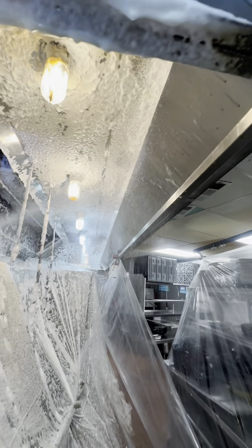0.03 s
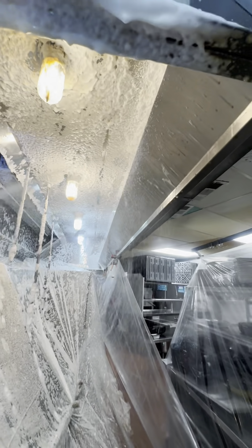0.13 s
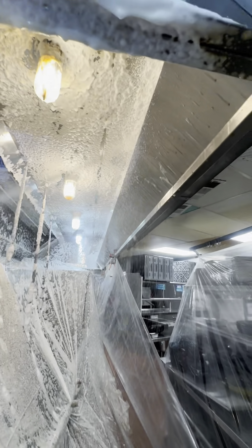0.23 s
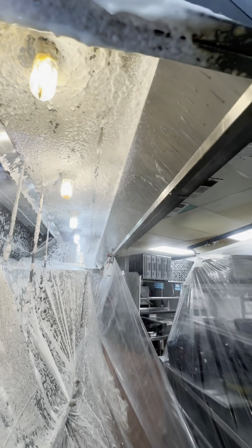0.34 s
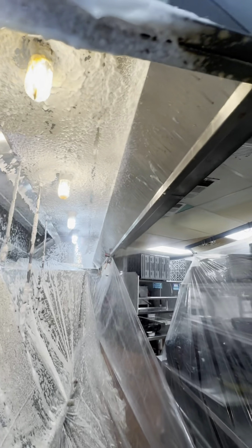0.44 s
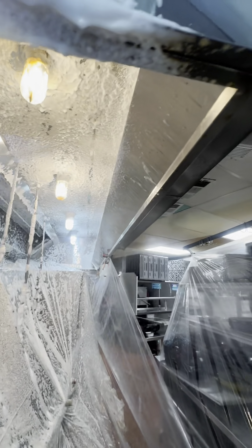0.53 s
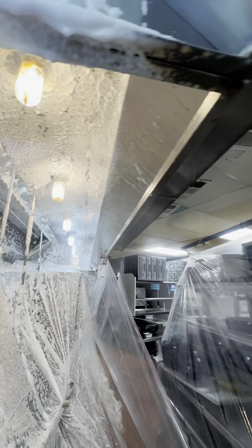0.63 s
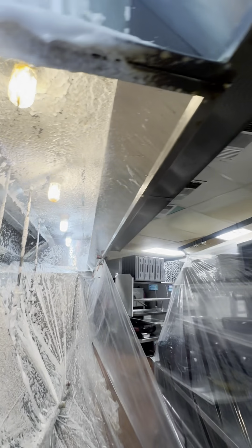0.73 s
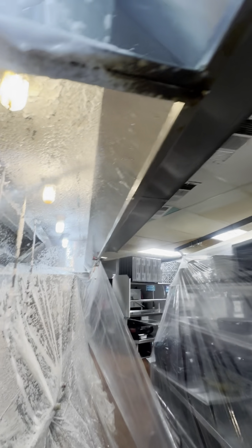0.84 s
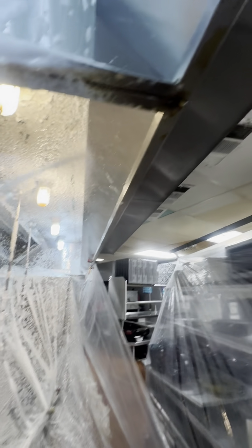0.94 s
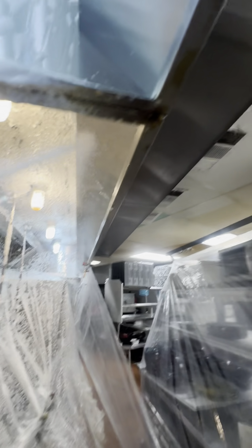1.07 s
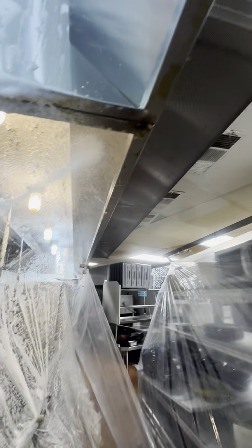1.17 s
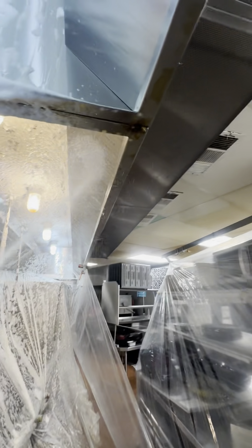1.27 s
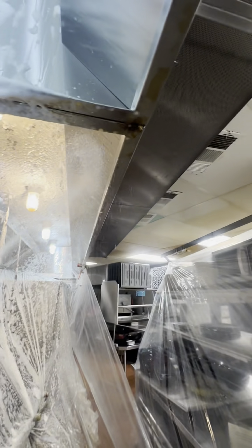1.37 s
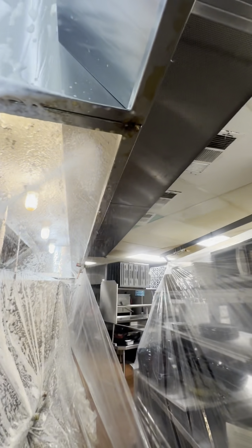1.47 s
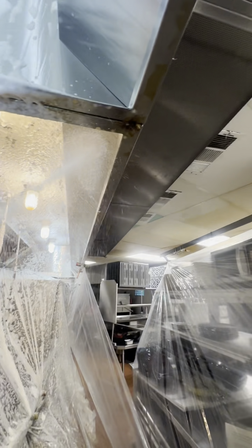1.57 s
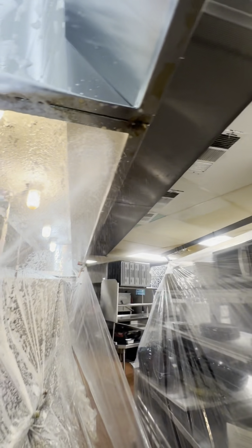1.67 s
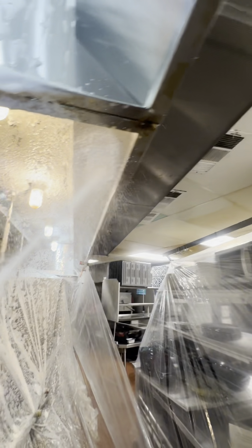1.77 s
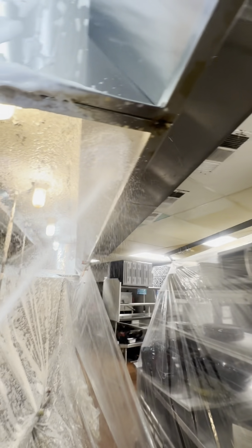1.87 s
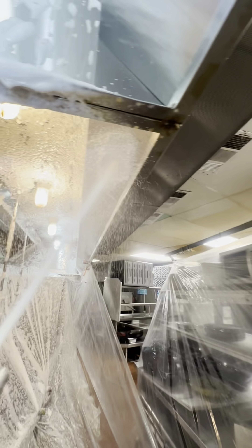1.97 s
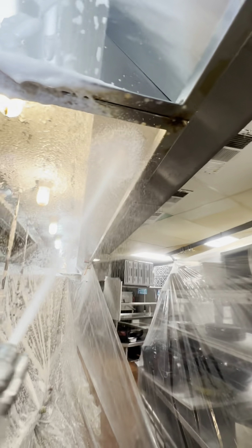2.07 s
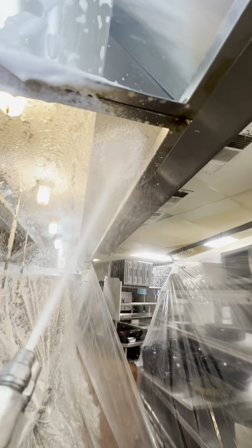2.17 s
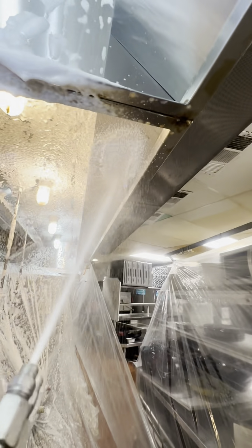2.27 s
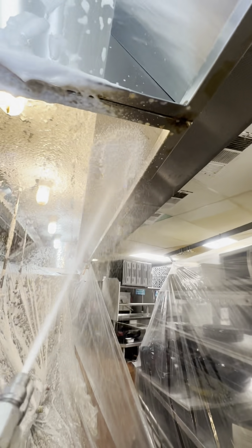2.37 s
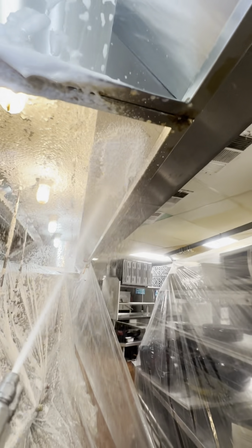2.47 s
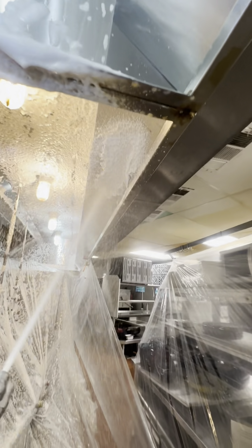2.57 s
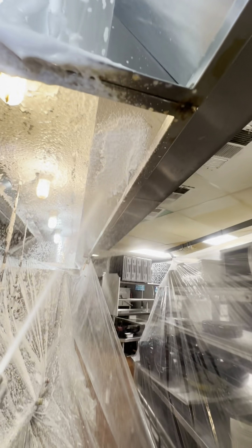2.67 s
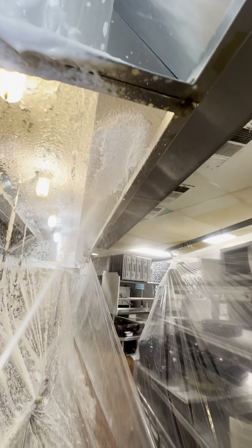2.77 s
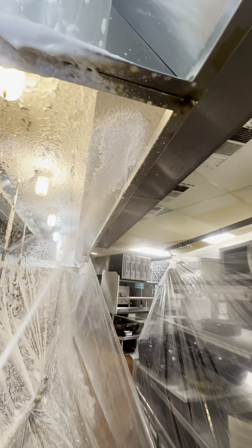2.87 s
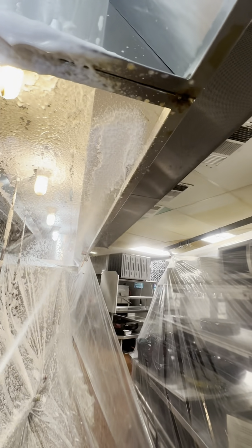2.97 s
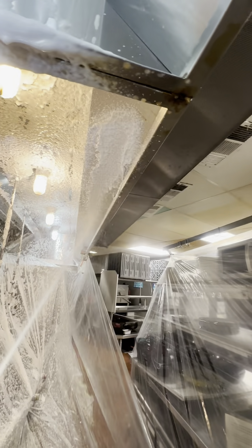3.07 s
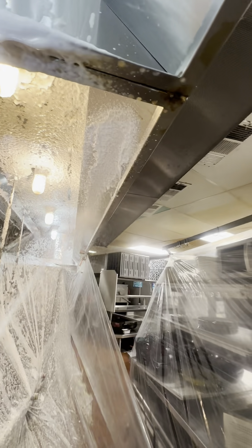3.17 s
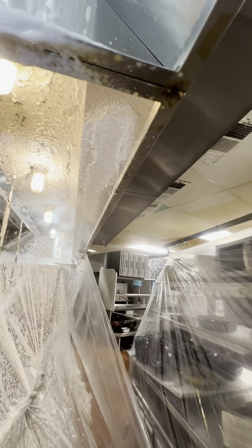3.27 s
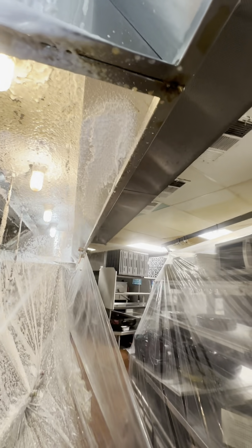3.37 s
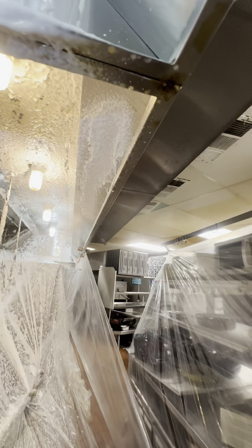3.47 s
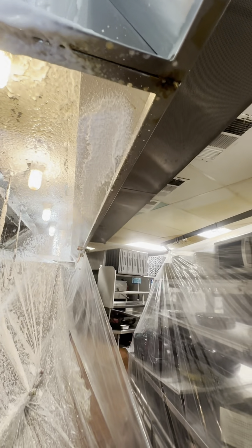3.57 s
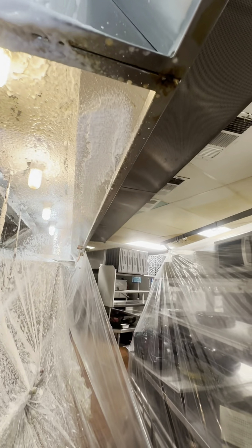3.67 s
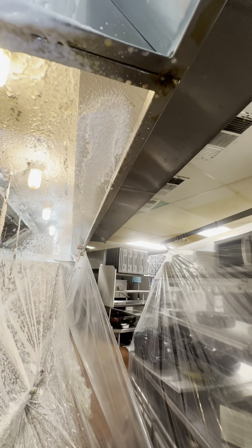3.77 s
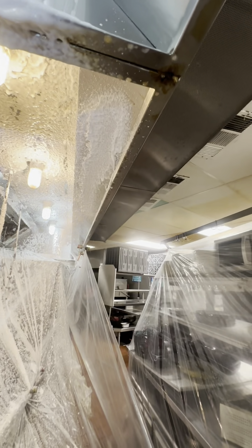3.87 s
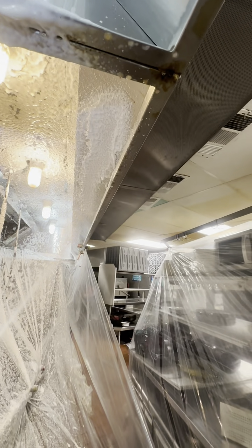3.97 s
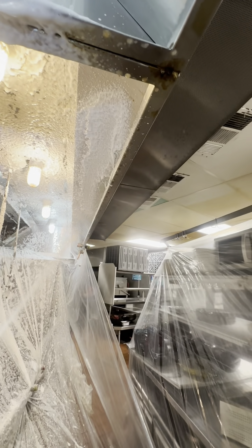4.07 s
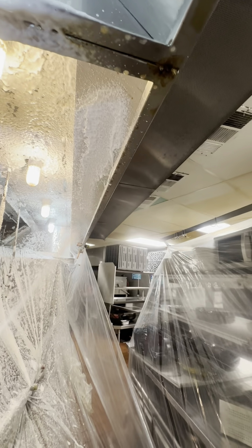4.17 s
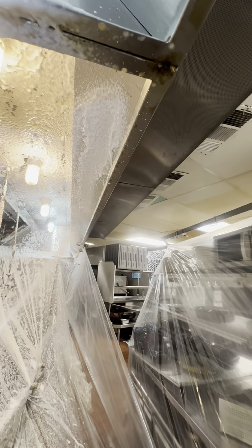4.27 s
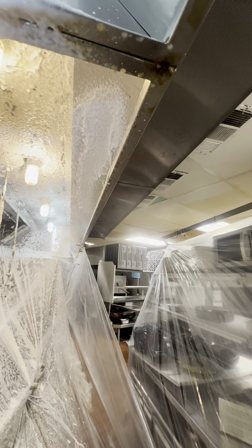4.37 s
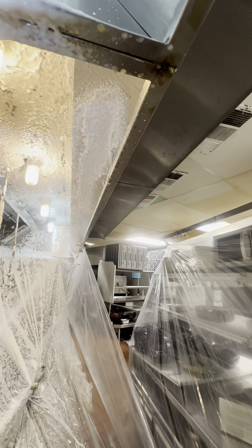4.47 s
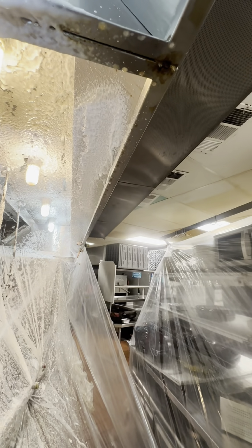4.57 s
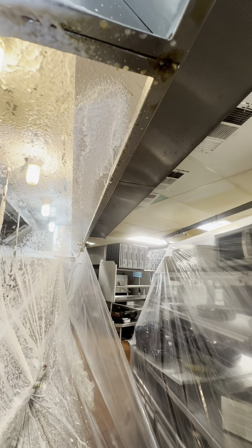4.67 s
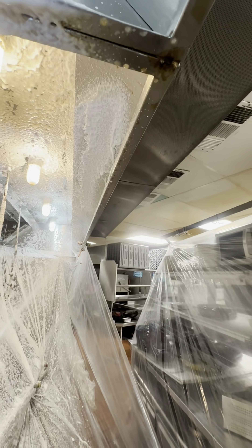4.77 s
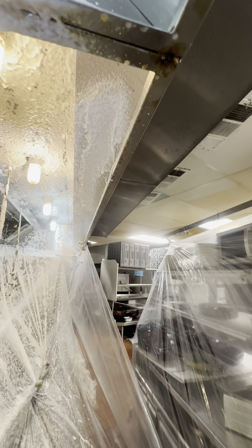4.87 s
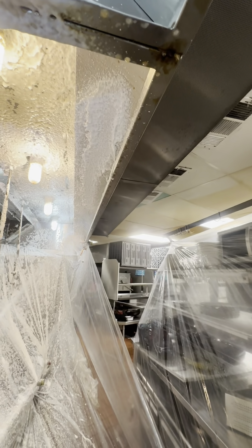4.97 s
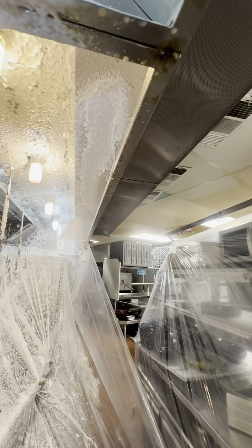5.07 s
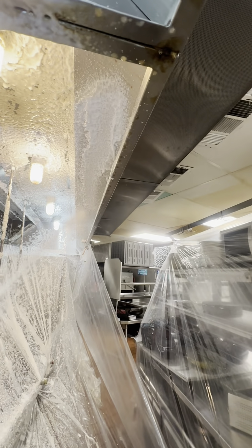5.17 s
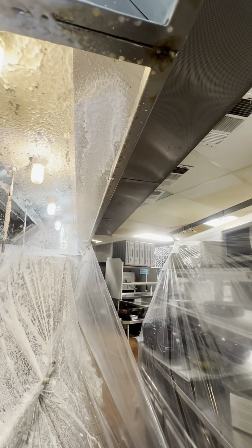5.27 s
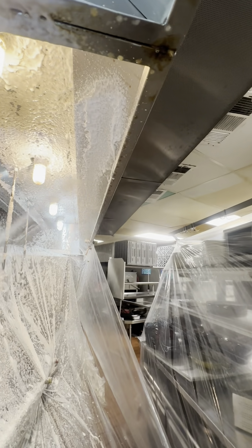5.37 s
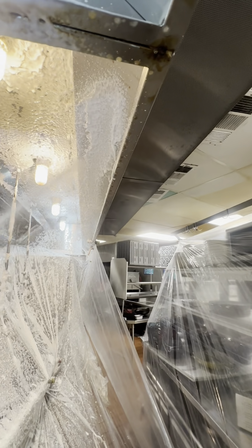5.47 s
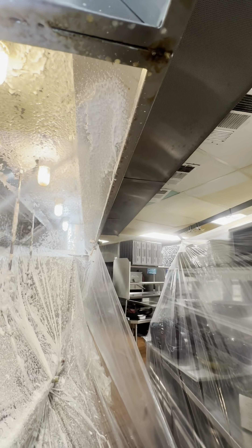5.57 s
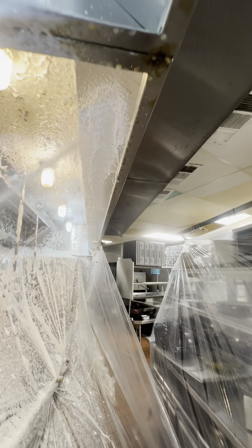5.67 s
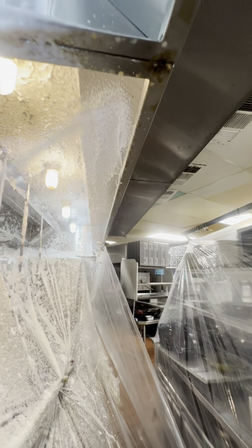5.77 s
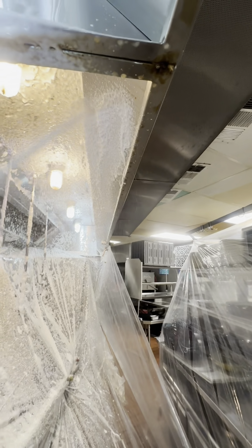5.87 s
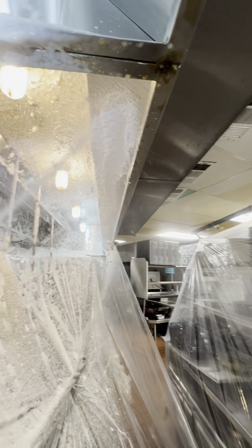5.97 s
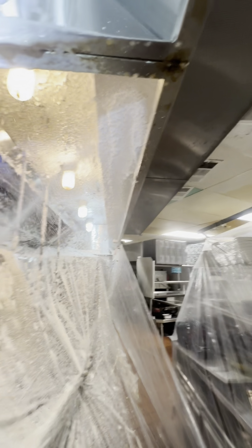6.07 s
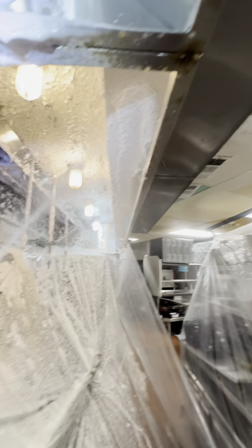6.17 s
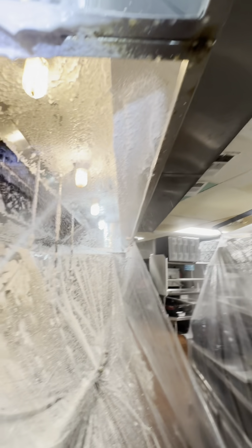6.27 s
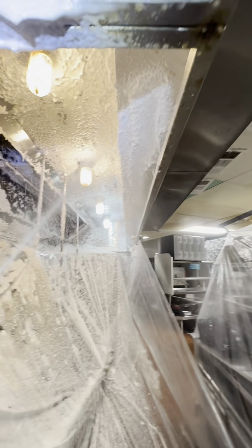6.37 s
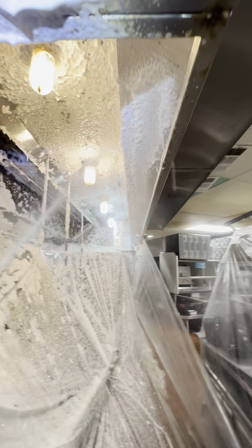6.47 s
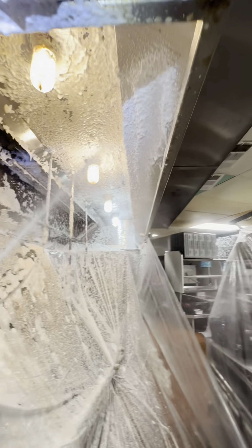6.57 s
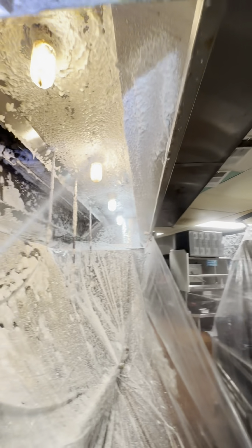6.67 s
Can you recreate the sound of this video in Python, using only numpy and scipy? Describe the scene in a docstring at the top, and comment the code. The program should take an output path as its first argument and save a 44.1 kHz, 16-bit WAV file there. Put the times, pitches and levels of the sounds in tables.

```python
"""A steel kitchen hood with hanging plastic sheets, swept by a pressure washer jet close to a phone.
A faint pump hum and a low rumble of sheet steel, both filtered noise, lie underneath.
On top, the jet strikes five places: each splash is noise mixed with short ringing drops.
The phone's two microphone ports colour each place differently left and right, so the hiss
changes colour and side as the wand moves, and narrow bands of it turn hollow for a while."""
import sys
import numpy as np
from scipy import signal
from scipy.fft import rfft, irfft
from scipy.io import wavfile
from scipy.ndimage import uniform_filter1d

SR = 44100
rng = np.random.default_rng(int(sys.argv[2]) if len(sys.argv) > 2 else 0)


def waveform_to_disk(signal):
    """Save audio, clipped to [-1, 1], as 16-bit WAV at the path in sys.argv[1]."""
    frames = np.transpose(np.atleast_2d(signal))
    scaled = np.clip(frames, -1, 1) * 32767
    samples = np.round(scaled).astype(np.int16)
    wavfile.write(sys.argv[1], SR, samples)


N = 295911  # samples
EDGE_HZ = 15650  # nothing but a trace is heard above this
FRAME, HOP = 512, 128  # short-time spectra, samples


def gain_of(db):
    """Decibels to an amplitude factor."""
    return 10 ** (np.asarray(db) / 20)


def evened(x):
    """Scaled to rms 1."""
    return x / np.sqrt(np.mean(abs(x) ** 2) + 1e-20)


def curve(points_hz, values, hz):
    """Straight lines between points on a log-frequency axis, as a column."""
    return np.interp(np.log(hz + 1), np.log(points_hz + 1), values)[:, None]


def over_time(points, t):
    """Straight lines between (seconds, value) points."""
    return np.interp(t, *np.transpose(points))


def seconds_outside(t, start, end):
    """How far each moment lies before the start or after the end; 0 in between."""
    return np.maximum(np.maximum(start - t, t - end), 0)


def spectra_of(x):
    """Short-time spectra."""
    return signal.stft(x, nperseg=FRAME, noverlap=FRAME - HOP)[2]


def sound_of(z):
    """Two channels of sound back from short-time spectra."""
    return signal.istft(z, nperseg=FRAME, noverlap=FRAME - HOP)[1][:, :N]


# Pump hum through the hose, stronger at first, then fainter.
# Each row: time in seconds, level in dB.
PUMP_LEVEL = [(.55, -56), (.85, -62.5)]
PUMP_HZ = 58.5


def pump():
    """Noise through a narrow resonance makes a faint hum that wavers."""
    hz = np.fft.rfftfreq(N, 1 / SR)
    resonance = 1 / (1 + ((hz - PUMP_HZ) / 2.8) ** 2)
    hum = irfft(rfft(rng.standard_normal(N)) * resonance, N)
    return gain_of(over_time(PUMP_LEVEL, np.arange(N) / SR)) * evened(hum)


# Colour of the struck steel's roar, cut off at the last point.
# Each row: frequency in Hz, relative level in dB per Hz.
RUMBLE_COLOUR = [(22, -27), (40, -10), (60, -12), (100, 0), (140, -1.5), (200, -0.5), (300, -7), (430, -16)]
# Panel modes driven by the roar, levels before the rumble follows the jet.
# Each row: frequency in Hz, width in Hz, level in dB.
PANEL_MODES = [(455.3, 4.7, -58.5), (515.7, 3.4, -58.5)]
# The rumble swells briefly as the jet crosses an edge of the hood.
# Each row: peak time in seconds, rise in dB.
EDGE_SWELLS = [(2.3, 7), (4.42, 3.7)]
SWELL_WIDTH_S = 0.12
ROAR_DB = -50.5  # before it follows the jet
RUMBLE_FOLLOW = 1  # dB of rumble per dB of jet


def rumble():
    """Low roar of struck steel, nearly alike in both ports, with panels ringing in it."""
    hz = np.fft.rfftfreq(N, 1 / SR)
    t = np.arange(N) / SR
    common, own = rng.standard_normal(N), rng.standard_normal((2, N))
    noise = rfft(common + 0.21 * own)

    points_hz, colour_db = np.transpose(RUMBLE_COLOUR)
    colour = gain_of(curve(points_hz, colour_db, hz)[:, 0]) * (hz < points_hz[-1])
    roar = gain_of(ROAR_DB) * evened(irfft(noise * colour, N))

    rings = 0
    for mode_hz, width_hz, level_db in PANEL_MODES:
        mode = 1 / (1 + ((hz - mode_hz) / width_hz) ** 2)
        rings = rings + gain_of(level_db) * evened(irfft(noise * mode, N))

    swell_db = sum(rise_db * np.exp(-((t - peak) / SWELL_WIDTH_S) ** 2) for peak, rise_db in EDGE_SWELLS)
    jet = jet_db()
    drive = gain_of(RUMBLE_FOLLOW * (jet - jet.mean()) + swell_db)
    return (roar + rings) * drive * gain_of([[.7], [-.7]])  # slightly stronger on the left


# How hard the jet strikes, all places together, before the hollows and nulls.
# Each row: time in seconds, level in dB.
JET_LEVEL = [(0.0, -22.5), (0.35, -22.5), (0.6, -21.5), (0.85, -19), (1.2, -17.5), (1.36, -19.5),
             (1.55, -17.5), (1.72, -18), (2.12, -17), (2.3, -21.5), (3.05, -24), (4.1, -24.5), (4.5, -26),
             (4.95, -25.5), (5.4, -22), (5.8, -18.5), (6.0, -21), (6.71, -21)]


def jet_db():
    """Level of the jet at every sample."""
    return over_time(JET_LEVEL, np.arange(N) / SR)


# Names of the five struck places, in the column order of the port tables.
PLACES = ["ahead", "aside", "low", "passing", "near"]
# The wand dwells on a place; weights compete with those of the other places.
# Each row: place, start in seconds, end in seconds, weight at the start in dB, weight at the end in dB.
DWELLS = [("near", 0.0, 0.97, 0, 0), ("low", 0.0, 0.14, -1.5, -14), ("aside", 0.099, 0.26, -4, -4),
          ("ahead", 0.0, 0.11, -2.4, -8), ("passing", 0.27, 0.77, -5, -9.5), ("ahead", 0.52, 0.78, -3, -10),
          ("ahead", 0.906, 2.26, 0, 0), ("low", 1.06, 1.33, -13, -1.3), ("aside", 1.24, 1.3, -10, -1),
          ("near", 1.45, 1.66, -1, -6.5), ("passing", 2.34, 3.33, 0, -5),
          ("ahead", 2.35, 3.08, -12.5, -8.5), ("aside", 2.84, 5.03, -2.6, 0), ("low", 3.41, 3.72, -7, -7.5),
          ("passing", 5.04, 5.43, 1.4, -10.5), ("low", 5.28, 5.65, 1.6, -5.5),
          ("ahead", 5.4, 5.64, 0, -0.71), ("aside", 5.55, 5.58, 0, -5), ("near", 5.56, 5.93, 0, 0),
          ("ahead", 5.86, 6.08, -1.9, -5.5), ("low", 5.97, 6.71, 0, 0)]
# Scattered water keeps every place faintly wet: one weight in dB for each place.
STRAY_DB = [-21, -23, -21, -17.5, -20.5]
SWING_DB_PER_S = 134  # how fast a place's weight rises and fades as the jet arrives and leaves


def aim_db():
    """How the jet's power is shared among the places as the wand dwells and swings on."""
    t = np.arange(N) / SR
    power = gain_of(STRAY_DB)[:, None] ** 2 * np.ones(N)
    for place, start, end, first_db, last_db in DWELLS:
        weight_db = np.interp(t, [start, end], [first_db, last_db])
        weight_db = weight_db - SWING_DB_PER_S * seconds_outside(t, start, end)
        power[PLACES.index(place)] += gain_of(weight_db) ** 2
    return 10 * np.log10(power / power.sum(axis=0))


DROP_SHARE = .2  # share of each splash's power made of separate large drops, 0-1
DROPS_PER_S = 2500


def spray(drop_share):
    """Countless fine droplets make noise; large drops of uneven size ring and die within a cycle or two."""
    size = gain_of(2.0 * np.minimum(rng.exponential(1, N), 4))
    size = size * (rng.random(N) < DROPS_PER_S / SR)
    kind = rng.integers(0, 6, N)
    t = np.arange(64) / SR
    drops = np.zeros(N)
    for k, drop_hz in enumerate(np.geomspace(2500, 9000, num=6)):
        ring = np.sin(2 * np.pi * drop_hz * t) * np.exp(-t * drop_hz / 0.63)
        drops += signal.oaconvolve(size * (kind == k), ring / np.linalg.norm(ring))[:N]
    share = np.clip(drop_share, 0, .9)
    fine = rng.standard_normal(N)
    z = spectra_of(np.sqrt(1 - share) * fine + np.sqrt(share) * evened(drops))
    mean_power = uniform_filter1d((abs(z) ** 2).mean(axis=1), size=5)
    return z / np.sqrt(mean_power)[:, None]  # white on average


def patches(shape, patchy_db):
    """The jet breaks up unevenly: drifting islands of louder and softer hiss."""
    field = rng.standard_normal(shape)
    field = uniform_filter1d(field, size=5, axis=0)
    field = uniform_filter1d(field, size=16, axis=1)
    return gain_of(patchy_db * evened(field))


# What both ports share, relative levels before each splash is evened.
# Each row: frequency in Hz, then dB per Hz for ahead, aside, low, passing and near.
SHARED_COLOUR = [(312, -12, -20.5, -18.5, -13.5, -15.5), (664, -7, -10.5, -11.5, -11.5, -10.5),
                 (780, -7.5, -15.5, -19.5, -16.5, -13), (1030, -8, -13, -12, -10.5, -10),
                 (1320, -7, -15, -13, -11.5, -11.5), (2220, -5, -13.5, -11.5, -11.5, -8),
                 (2460, -5, -8.5, -29, -19, -13), (2990, -1.3, -6.5, -14, -12.5, -5),
                 (3980, -2.5, -5.5, -13.5, -14.5, -6), (4600, -3.5, -8, -20, -9, -8),
                 (5440, -3, -7, -9.5, -14, -13.5), (6200, 2, -0.1, -3.5, -11, -41),
                 (7210, 2, -0.5, -5.5, -35, -9), (8030, -4.5, -9, -16, -17, -15),
                 (8830, -7.5, -6, -3.5, -9.5, -3.5), (10277, -15.5, -16, -20, -22, -13),
                 (11620, -73, -62, -77, -65, -57), (13860, -49, -65, -30, -70, -82),
                 (14500, -15.2, -26.5, -22.9, -21.5, -23)]
# What the ports hear with opposite sign, on the same scale.
# Each row: frequency in Hz, then dB per Hz for ahead, aside, low, passing and near.
OPPOSED_COLOUR = [(300, -16.0, -21.0, -21.0, -19.0, -21.0), (550, -10.0, -13.0, -14.0, -13.0, -15.0),
                  (780, -7.0, -11.0, -13.0, -11.0, -12.0), (1100, -10.0, -13.0, -14.0, -12.0, -15.0),
                  (1500, -12.0, -15.0, -14.0, -15.0, -16.0), (2000, -8.0, -12.0, -11.0, -13.0, -10.0),
                  (2500, -3.0, -6.0, -6.0, -6.0, -6.0), (3100, -7.0, -8.0, -9.0, -9.0, -10.0),
                  (3900, -15.0, -13.0, -14.0, -14.0, -20.0), (4600, -4.0, -3.0, -6.0, -5.0, -7.0),
                  (5400, 0.0, 0.0, 0.0, -1.0, -2.0), (6300, -0.0, -2.0, -2.0, 0.0, -1.0),
                  (7100, -1.0, -3.0, -1.0, -1.0, -3.0), (8000, -2.0, -4.0, -1.0, -2.0, -5.0),
                  (9000, -7.0, -11.0, -11.0, -8.0, -9.0), (10000, -5.0, -9.0, -12.0, -8.0, -5.0),
                  (11500, -7.0, -11.0, -11.0, -12.0, -8.0), (15000, -8.0, -13.0, -13.0, -11.0, -12.0)]
# How alike the shared and opposed parts are.
# Each row: frequency in Hz, then likeness from 0 to 1 for ahead, aside, low, passing and near.
LIKENESS = [(300, 0.94, 0.62, 0.86, 0.82, 0.83), (550, 0.98, 0.9, 0.98, 0.98, 0.98),
            (780, 0.94, 0.72, 0.86, 0.84, 0.95), (1100, 0.98, 0.87, 0.97, 0.98, 0.98),
            (1500, 0.89, 0.83, 0.98, 0.93, 0.93), (2000, 0.82, 0.83, 0.87, 0.72, 0.93),
            (2500, 0.76, 0.79, 0.19, 0.38, 0.62), (3100, 0.5, 0.78, 0.44, 0.59, 0.75),
            (3900, 0.21, 0.57, 0.23, 0.29, 0.3), (4600, 0.7, 0.87, 0.44, 0.37, 0.71),
            (5400, 0.44, 0.71, 0.39, 0.3, 0.49), (6300, 0.51, 0.77, 0.98, 0.53, 0.4),
            (7100, 0.37, 0.9, 0.84, 0.44, 0.51), (8300, 0.42, 0.52, 0.38, 0.35, 0.45)]
# How far the opposed part leads, where it is like the shared part.
# Each row: frequency in Hz, then phase in radians for ahead, aside, low, passing and near.
LEAD = [(300, 0.7, 1.1, 0.9, 0.8, 0.8), (550, 0.4, 0.8, 0.7, 0.7, 0.4), (780, 0.2, 1.3, 0.8, 0.6, 0.4),
        (1100, -0.3, 0.8, 0.3, 0.1, -0.1), (1500, -0.4, 1.0, 0.4, 0.2, -0.1),
        (2000, 0.0, 3.1, 1.3, 1.2, 0.3), (2500, -0.8, 4.4, 1.1, 4.2, -0.2),
        (3100, -1.5, 4.7, -0.8, 4.6, -1.4), (3900, 0.7, 5.7, 0.1, 4.6, 0.8),
        (4600, 0.1, 6.2, -1.9, 2.3, 0.2), (5400, -0.8, 6.6, -4.3, 3.2, 0.7),
        (6300, -1.4, 7.6, -3.2, 4.4, -1.5), (7100, -1.5, 9.3, -2.3, 4.0, -0.9),
        (8000, -1.4, 10.8, -1.6, 5.7, -0.7)]


def splash(place, level_db, drop_share):
    """Spray from one place reaches two ports as a shared part and a part of opposite sign."""
    hz = np.fft.rfftfreq(FRAME, 1 / SR)
    tables = map(np.transpose, (SHARED_COLOUR, OPPOSED_COLOUR, LIKENESS, LEAD))
    shared_db, opposed_db, like, lead = (curve(table[0], table[1 + place], hz) for table in tables)
    direct = spray(drop_share)
    scattered = np.roll(direct, direct.shape[1] // 2, axis=1)  # unrelated spray, thrown back by the hood
    shared = direct * gain_of(shared_db)
    blend = like * np.exp(1j * lead) * direct + np.sqrt(1 - like ** 2) * scattered
    opposed = blend * gain_of(opposed_db)
    ports = np.array([shared + opposed, shared - opposed])
    little_bass = np.minimum(hz / 258.0, 1)[:, None] ** 2
    band = little_bass * (hz < EDGE_HZ)[:, None]
    ports = ports * band * patches(direct.shape, patchy_db=2.0)
    return gain_of(level_db) * evened(sound_of(ports))


# A hollow that slides as the angle to the jet changes; a negative depth is a lift.
# Each row: time in seconds, centre in Hz, width as a share of the centre, left depth in dB, right depth in dB.
SLIDING_HOLLOW = [(.95, 5030, 0.38, 0, -3), (1.07, 4600, 0.32, 11.5, -1.5), (1.26, 6550, 0.17, -2, 1.5),
                  (1.55, 7100, 0.31, 3.5, -1), (1.8, 7300, 0.21, -2, 8), (2.2, 7460, 0.13, 5.5, 2),
                  (2.35, 6500, 0.22, 0.5, -5), (2.9, 7900, 0.085, -2.5, 6), (3.25, 7450, 0.086, -4, 14),
                  (3.7, 7360, 0.12, -1.5, 2.5), (4.8, 7300, 0.037, 10, 0), (5.0, 7900, 0.1, -3.5, 16),
                  (5.27, 6630, 0.091, -5, -2), (5.4, 8000, .1, 15, -4), (5.5, 8850, 0.06, 9, 10),
                  (5.93, 10000, 0.11, 6.5, 5), (6.05, 7050, .06, 6, 1), (6.2, 6200, 0.057, 8, 3),
                  (6.71, 6500, 0.047, 14, -0.5)]
# Narrow dips of the ports themselves; a negative depth is a lift.
# Each row: frequency in Hz, width in Hz, left depth in dB, right depth in dB.
PORT_DIPS = [(4540, 180, 0, 9), (8730, 100, 6, 5.5), (786, 29, 7.5, -1)]


def hollowed(x):
    """Direct sound and a bounce off the phone's body cancel in a band set by the angle, drawn as a smooth dip."""
    z = spectra_of(x)
    hz = np.fft.rfftfreq(FRAME, 1 / SR)[:, None]
    t = np.arange(z.shape[-1]) * HOP / SR
    s, *columns = np.transpose(SLIDING_HOLLOW)
    centre_hz, width, *depth_db = (np.interp(t, s, column) for column in columns)
    dip = np.exp(-((hz / centre_hz - 1) / np.maximum(width, .03)) ** 2)
    loss_db = dip * np.array(depth_db)[:, None]
    for dip_hz, width_hz, *dip_db in PORT_DIPS:
        dip = np.exp(-((hz - dip_hz) / width_hz) ** 2)
        loss_db = loss_db + dip * np.array(dip_db)[:, None, None]
    return sound_of(z * gain_of(-loss_db))


# Names of the two parts of the stereo hiss.
PARTS = ["shared", "opposed"]
# Bands where the hiss turns hollow for a while; depths before the raggedness.
# Each row: part, start in seconds, end in seconds, centre at the start in Hz, centre at the end in Hz,
# width in Hz, depth in dB.
NULLS = [("shared", .11, 0.906, 5550, 5620, 375, 81), ("shared", .34, 0.93, 7940, 7950, 430, 39),
         ("shared", .13, 0.498, 5800, 7000, 830, 23), ("shared", 2.0, 2.13, 7600, 7650, 540, 40),
         ("shared", 2.36, 2.7, 8100, 7800, 430, 60), ("shared", 2.72, 2.85, 7060, 7040, 400, 55),
         ("shared", 2.47, 2.73, 6950, 6630, 520, 23), ("shared", 2.44, 2.6, 5000, 4860, 250, 30),
         ("shared", 2.62, 2.87, 5160, 5500, 200, 25), ("shared", 3.17, 3.33, 5540, 5600, 220, 45),
         ("shared", 3.43, 3.62, 5500, 5450, 250, 42), ("shared", 0.0, .45, 2460, 2340, 110, 30),
         ("shared", 0.0, .13, 5000, 4950, 240, 45), ("shared", 1.26, 1.41, 4950, 4740, 210, 28),
         ("shared", 1.19, 1.23, 5500, 5600, 150, 28), ("shared", 1.44, 1.63, 5450, 5400, 170, 30),
         ("shared", 2.29, 2.72, 2500, 2400, 97, 13), ("shared", 3.55, 4.8, 8360, 8100, 290, 10),
         ("shared", 5.15, 5.42, 2480, 2600, 170, 27), ("shared", 4.93, 5.25, 5600, 5420, 300, 53),
         ("shared", 5.25, 5.48, 5300, 4830, 350, 45), ("shared", 5.09, 5.25, 6400, 7500, 520, 50),
         ("shared", 5.58, 5.65, 4950, 4950, 220, 30), ("shared", 5.65, 5.75, 5770, 6100, 310, 45),
         ("shared", 5.72, 5.87, 8100, 8050, 350, 42), ("shared", 5.75, 5.86, 5600, 5550, 250, 45),
         ("shared", 5.7, 5.88, 7000, 6900, 560, 39), ("shared", 5.87, 5.93, 6200, 6300, 350, 45),
         ("shared", 5.93, 6.71, 2580, 2660, 284, 55), ("shared", 5.98, 6.71, 4970, 5230, 334, 45),
         ("shared", 6.06, 6.71, 3700, 3800, 1150, 42), ("shared", 6.07, 6.71, 7900, 7940, 300, 52),
         ("opposed", .15, 1.25, 3900, 3800, 300, 30), ("opposed", 1.43, 2.45, 3600, 3850, 450, 32),
         ("opposed", 5.6, 5.92, 3600, 4100, 350, 30), ("opposed", 1.04, 1.13, 5900, 7700, 590, 14),
         ("opposed", 1.25, 1.33, 8600, 6200, 500, 14), ("opposed", 1.33, 1.42, 6200, 8600, 500, 9),
         ("opposed", 5.38, 5.55, 6300, 8400, 600, 18), ("opposed", 5.95, 6.04, 8600, 6200, 580, 14)]
NULL_FADE_S = 0.0093
NULL_WANDER = 0.16  # waver of the band's place, rms, as a share of its width
RAGGED_HZ = 800  # the wider a hollow band, the more it breaks into gaps and islands


def nulled(x):
    """Bands drop out of the shared or the opposed part for a while; wide ones break up."""
    z = spectra_of(np.array([x[0] + x[1], x[0] - x[1]]) / 2)
    hz = np.fft.rfftfreq(FRAME, 1 / SR)[:, None]
    t = np.arange(z.shape[-1]) * HOP / SR
    wanders = rng.standard_normal((len(NULLS), len(t)))
    wanders = evened(uniform_filter1d(wanders, size=16, axis=1))
    islands = uniform_filter1d(rng.standard_normal(z.shape[1:]), size=3, axis=0)
    islands = evened(uniform_filter1d(islands, size=18, axis=1))
    loss_db = np.zeros(z.shape)
    for (part, start, end, from_hz, to_hz, width_hz, depth_db), wander in zip(NULLS, wanders):
        fade = np.exp(-(seconds_outside(t, start, end) / NULL_FADE_S) ** 2)
        on = fade > .001
        raggedness = min((width_hz / RAGGED_HZ) ** 2, 1.3)
        ragged = np.clip(1 + raggedness * islands[:, on], 0, 2)
        centre_hz = np.interp(t[on], [start, end], [from_hz, to_hz])
        off_centre = (hz - centre_hz) / width_hz + NULL_WANDER * wander[on]
        band = np.exp(-off_centre ** 6)  # flat floor, steep sides
        loss_db[PARTS.index(part)][:, on] += depth_db * fade[on] * ragged * band
    shared, opposed = sound_of(z * gain_of(-loss_db))
    return np.array([shared + opposed, shared - opposed])


def jet_hiss():
    """The five splashes share the jet's power as the wand moves."""
    levels_db = jet_db() + aim_db()
    return sum(splash(place, level_db, DROP_SHARE) for place, level_db in enumerate(levels_db))


def scene():
    """The jet's hiss through the ports, over rumble and hum."""
    return nulled(hollowed(jet_hiss())) + rumble() + pump()


def record(dry):
    """The band limit of the recorder: a steep low-pass."""
    low_pass = signal.firwin(511, EDGE_HZ, window=("kaiser", 9), fs=SR)
    return signal.oaconvolve(dry, low_pass[None], "same")


dry = scene()
out = record(dry)
waveform_to_disk(out)
```